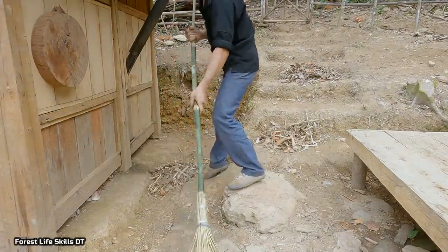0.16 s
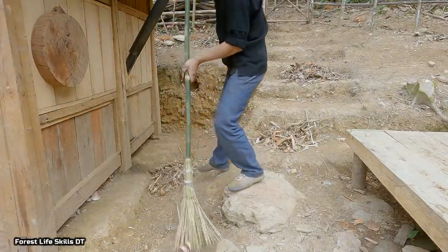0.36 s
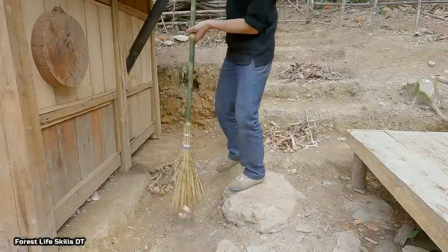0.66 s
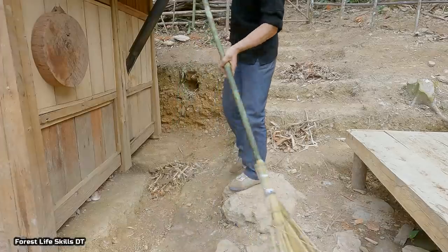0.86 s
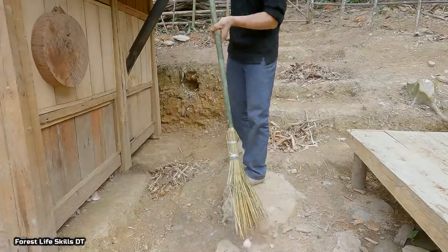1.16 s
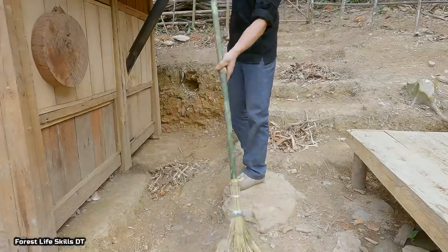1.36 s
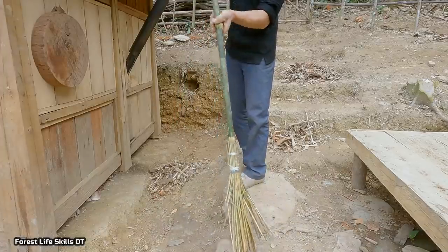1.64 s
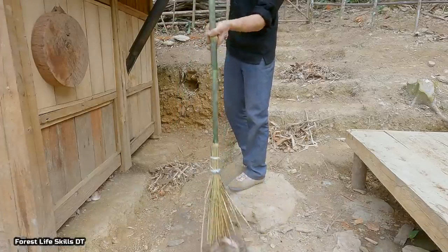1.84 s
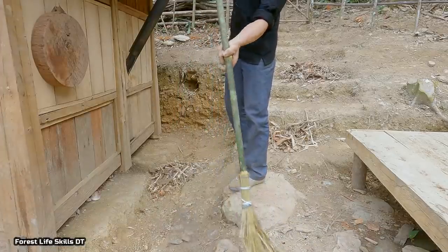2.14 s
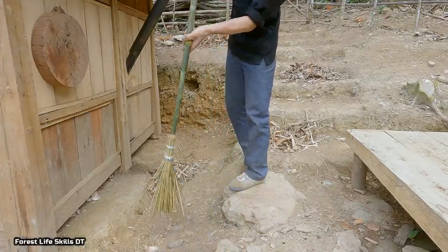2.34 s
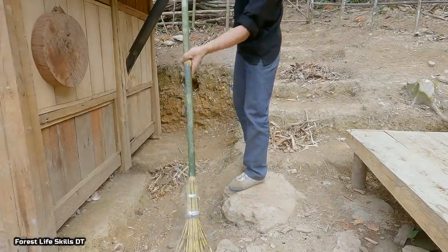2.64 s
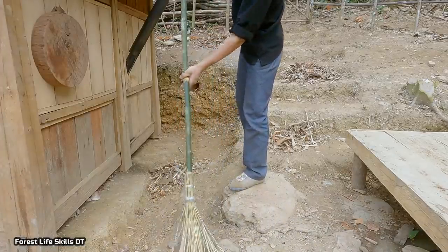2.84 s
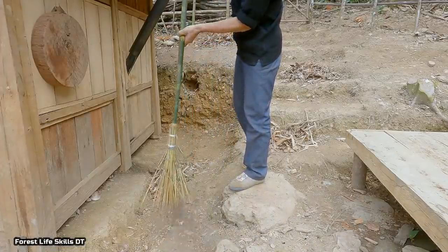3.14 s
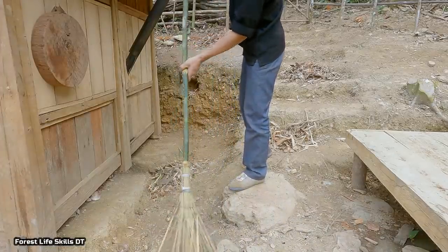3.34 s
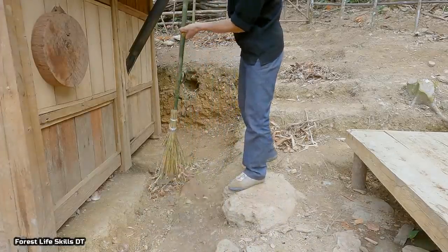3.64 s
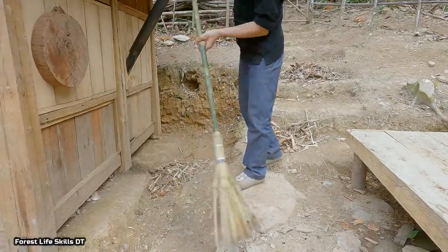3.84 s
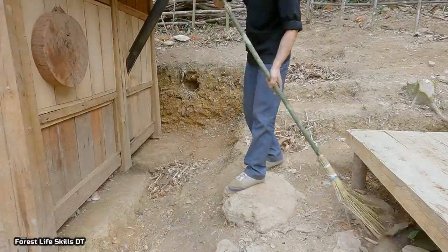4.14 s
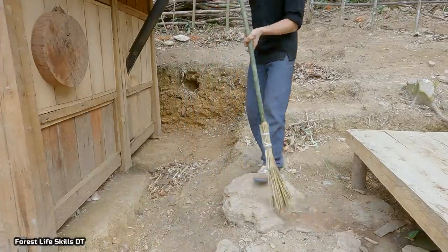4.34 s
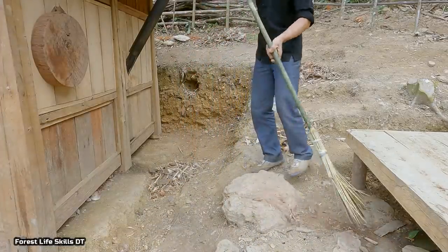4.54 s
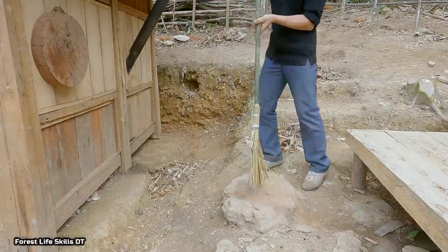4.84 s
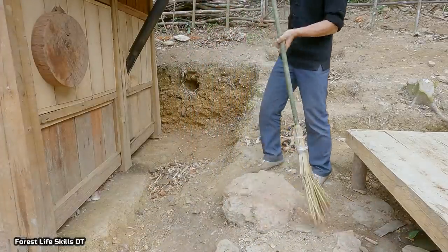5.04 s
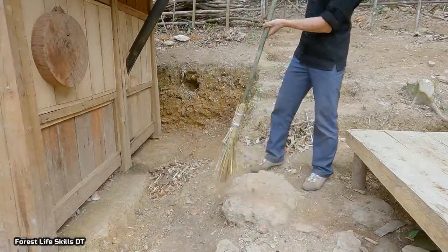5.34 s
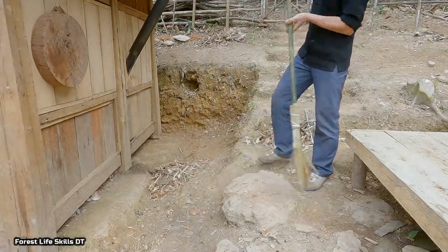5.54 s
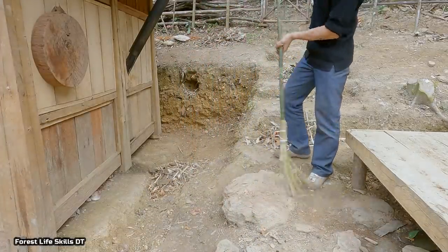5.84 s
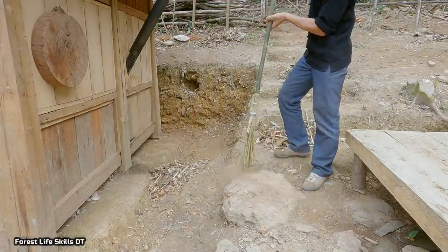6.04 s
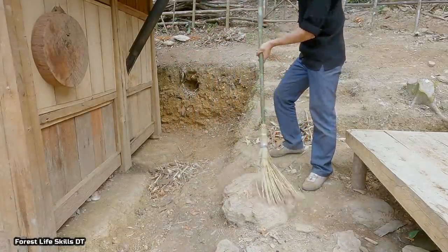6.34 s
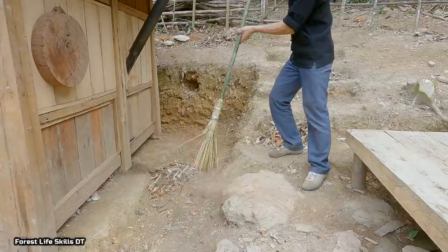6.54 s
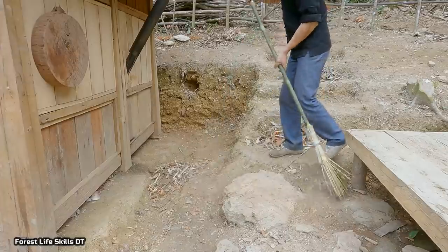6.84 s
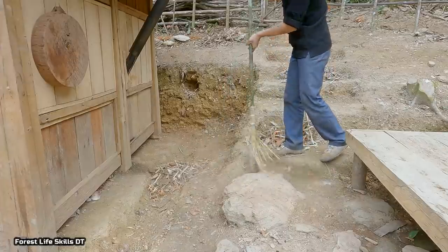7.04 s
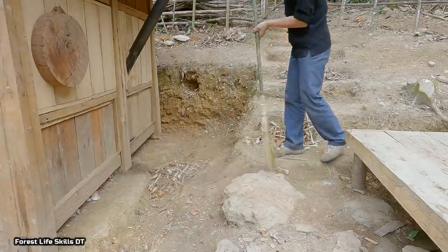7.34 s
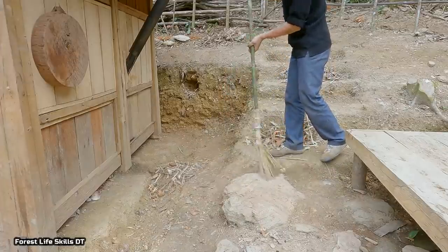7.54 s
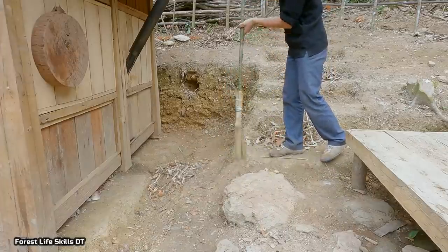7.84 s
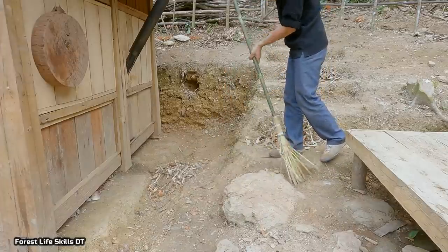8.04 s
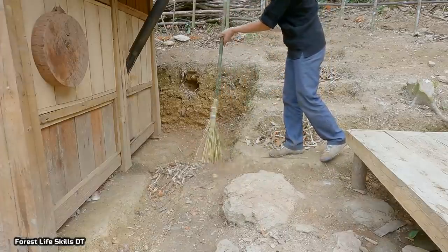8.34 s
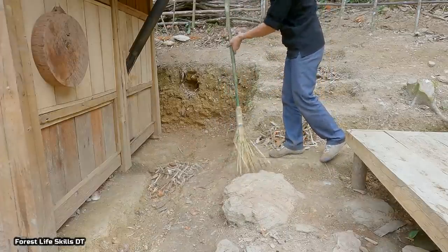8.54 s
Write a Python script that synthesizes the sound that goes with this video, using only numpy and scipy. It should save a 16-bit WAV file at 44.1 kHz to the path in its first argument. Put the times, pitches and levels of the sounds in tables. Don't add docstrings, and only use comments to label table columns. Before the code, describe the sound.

A stiff straw broom sweeps grit and dry leaves over packed earth in steady scratchy strokes, with snapping twigs and one wooden handle knock.

```python
import sys
import numpy as np
from scipy import signal
from scipy.io import wavfile

SR = 44100
rng = np.random.default_rng(int(sys.argv[2]) if len(sys.argv) > 2 else 0)


def dump(signal):
    limited = np.clip(np.atleast_2d(signal).T, -1, 1)
    pcm = np.round(limited * 32767).astype(np.int16)
    wavfile.write(sys.argv[1], SR, pcm)


def voltage_ratio(decibels):
    exponent = np.asarray(decibels, float) / 20
    return 10 ** exponent


N = 383229

# start t/s, rise t/s, hold t/s, tips level/dB, sag over hold level/dB
STROKES = [(0.4, 0.045, 0.16, -24.5, -2.5), (1.128, 0.046, 0.085, -25.5, -5),
           (1.511, 0.062, 0.1, -27.5, -3), (1.874, 0.034, 0.12, -32.5, 3),
           (2.296, 0.04, 0.088, -28.5, -1.5), (2.88, 0.088, 0.16, -24, -4), (3.517, 0.048, 0.1, -26.5, 0.5),
           (4.308, 0.074, 0.11, -24, -6.5), (4.79, 0.025, 0.14, -29.5, 3), (5.265, 0.048, 0.15, -27, -2),
           (5.907, 0.052, 0.13, -25.5, 1.4), (6.513, 0.025, 0.092, -26, 0), (7.048, 0.14, 0.1, -28.5, -8),
           (7.677, 0.011, 0.16, -26, -6.5), (8.281, 0.027, 0.12, -29, -0.5)]
# drag level/dB, grit re tips level/dB, dust re tips level/dB, trickle level/dB, lift-off rate/(dB/s)
BITES = [(-47.5, -9.5, -14, -54.5, 316), (-49, -8.5, -14, -59.5, 205), (-49.5, -10.5, -15.5, -53.5, 255),
         (-51.5, -8.5, -13, -50.5, 268), (-54, -10, -13, -56.5, 173), (-44.5, -9, -13, -54.5, 251),
         (-49, -9, -12.5, -51, 290), (-48, -8.5, -16, -53.5, 294), (-53.5, -9, -14.5, -52.5, 272),
         (-56, -10, -16, -51, 246), (-61, -9, -15, -52, 280), (-52.5, -9.5, -12, -46.5, 262),
         (-49, -8.5, -13, -46, 205), (-53, -9, -14.5, -68, 315), (-50, -8.5, -14, -51, 233)]
# start t/s, rise t/s, hold t/s, tips level/dB, drag level/dB
TOUCHES = [(-.03, 0.022, 0.012, -47.5, -61), (0.178, 0.022, 0.22, -62, -66),
           (0.358, 0.023, 0.067, -36, -56), (2.554, .004, 0.015, -58, -66),
           (5.042, .005, 0.066, -50.5, -73), (1.063, 0.047, 0.04, -30.5, -49),
           (1.432, 0.0071, 0.0066, -57, -80), (1.498, 0.014, 0.0029, -26, -39),
           (1.715, .005, 0.0056, -37.5, -56), (2.318, .004, 0.0036, -27.5, -62),
           (5.28, 0.0046, .006, -34.5, -49), (3.294, 0.0085, 0.0061, -45.5, -52.5),
           (3.416, 0.014, 0.0082, -54, -80), (3.852, 0.026, 0.024, -51.5, -78),
           (4.224, 0.013, 0.069, -33, -61), (4.609, 0.053, 0.17, -68, -78), (5.174, 0.05, 0.015, -55, -66),
           (5.574, 0.016, 0.0036, -64, -66), (5.835, 0.044, 0.0079, -30, -28),
           (6.268, 0.059, 0.027, -47.5, -54), (6.425, 0.041, 0.039, -34, -48.5),
           (7.011, 0.014, 0.13, -35, -57), (7.404, 0.039, 0.038, -41, -52),
           (7.597, 0.017, 0.062, -39.5, -57), (7.799, 0.013, 0.0061, -26, -47),
           (7.93, 0.013, 0.017, -51.5, -84), (5.652, 0.052, 0.046, -53.5, -81),
           (7.526, 0.011, .01, -43.5, -58), (8.207, 0.034, 0.12, -36, -58),
           (8.523, 0.0054, 0.099, -50, -68)]
RISE_POWER, TRICKLE_DB_PER_S, TOUCH_LIFT_DB_PER_S = 1.31, 54.5, 347.5
TOUCH_GRIT_DB, TOUCH_DUST_DB, STILL_DB, STILL_DRAG_DB = -9, -16, -71.5, -72
# f/Hz, level/dB per Hz
SCRATCH_SPECTRUM = [(290, -48), (500, -18), (545, -6), (717, -10.5), (782, -8.5), (1370, 3.5), (1580, -5.5),
                    (1700, 1), (2510, 6.5), (2740, -2.5), (5790, -2), (11900, -4), (15700, -40)]
# f/Hz, level/dB per Hz
DRAG_SPECTRUM = [(15, -52), (25, -8), (108, -35), (151, 0.5), (260, -1.5), (316, 7.5), (700, -14),
                 (910, -33), (1540, -120)]
DRAG_LUMPS_DB = 3
DULLING_DB_PER_DB = 0.086
# t/s, left-right level/dB
BROOM_PAN = [(0, -0.5), (.24, -0.5), (.89, 5), (1.0, 0), (2.9, 1.5), (4.04, 3), (4.15, 0), (5.7, 0),
             (7.3, 1.5), (8.25, 0), (8.69, 2.5)]
# f/Hz, likeness/1
LIKENESS = [(40, 0.52), (300, 0.61), (600, 0.58), (1200, 0.54), (2400, 0.33), (4000, 0.35), (8000, 0.8),
            (15000, .2)]
# f/Hz, level/dB
LEAN = [(60, 1.5), (250, -.5), (600, -2.5), (3000, -2.5), (8000, .5), (13000, -1)]
# t/s, peak level/dB, pitch f/Hz
TWIG_CRACKS = [(0.371, -35, 4600), (1.055, -29.5, 3730), (1.0931, -43, 4810), (1.5135, -17, 5700),
               (1.7247, -17.5, 6250), (1.8826, -44, 4220), (1.904, -28, 5150), (1.966, -12.5, 4400),
               (1.978, -10, 4280), (2.0098, -11, 5540), (2.314, -23, 4880), (2.3232, -11.5, 5150),
               (2.878, -38, 2890), (2.8955, -25, 4550), (6.458, -21, 4840), (3.534, -31, 6680),
               (4.2338, -24.5, 3900), (4.8086, -16, 5800), (5.2815, -24, 5200), (5.8565, -18.5, 3700),
               (6.453, -24, 3420), (6.5354, -13.5, 3610), (7.024, -17, 5260), (7.031, -12.5, 5500),
               (7.6166, -14.5, 5120), (7.6918, -14, 5580), (7.8121, -8.5, 3400), (8.2187, -46, 4780),
               (8.236, -25, 6650), (8.401, -10, 6000)]
# t/s, peak level/dB, pitch f/Hz
PEBBLE_TICKS = [(0.2075, -41, 4010), (0.8415, -28, 6000), (0.9507, -43, 3940), (1.4416, -28, 5010),
                (1.7764, -30, 5730), (2.2159, -28, 5820), (2.5616, -30.5, 4580), (3.232, -30, 4000),
                (5.658, -36, 6420), (2.7916, -37, 3850), (3.3139, -25, 6010), (3.4406, -30.5, 2430),
                (3.49, -35.5, 3440), (3.8482, -39, 3980), (3.9045, -35, 5540), (4.0507, -41, 5580),
                (4.6184, -33, 4860), (4.6628, -30, 3580), (5.0594, -25, 5150), (5.205, -31, 3980),
                (5.22, -30, 5470), (5.6017, -22, 2600), (6.343, -26, 5620), (6.4273, -25, 3770),
                (6.9007, -36, 4530), (7.44, -24, 4390), (7.5283, -28.5, 5660), (8.0585, -26.5, 5370),
                (8.15, -35, 5200), (8.536, -30, 2800)]
# t/s, peak level/dB, pitch f/Hz
PATTER = [(0.2433, -48, 3970), (0.445, -5, 3460), (0.456, -8, 5900), (0.8939, -38, 4260),
          (1.435, -30, 4090), (1.4654, -43, 5310), (1.7524, -30, 4340), (1.8522, -44, 4040),
          (2.3146, -23, 5100), (2.6189, -45, 1630), (2.7596, -39, 4380), (2.9442, -5, 4840),
          (3.8558, -32, 5680), (3.895, -40, 5600), (4.0644, -46, 3940), (4.2498, -17, 3790),
          (4.263, -19, 5670), (4.2744, -18, 4600), (4.7315, -35, 4040), (5.1929, -44, 4510),
          (5.606, -48, 4090), (5.6398, -47, 1590), (5.7083, -35, 4070), (6.2874, -42, 5960),
          (6.992, -37, 3990), (7.43, -30, 4430), (7.4794, -38, 5130), (7.561, -28, 5970),
          (7.6253, -20, 6670), (7.8184, -18, 3340)]
CRACK_T60_S, TICK_T60_S, PATTER_T60_S, PATTER_DB = 0.03, 0.022, 0.037, -6
# t/s, peak level/dB, pitch f/Hz, t60 t/s
CLODS = [
    (2.18, -42, 826, 0.032),
    (4.749, -60, 589, 0.099),
    (5.096, -36.5, 1100, 0.048),
    (5.202, -36, 1750, 0.081),
    (5.853, -17.5, 1170, 0.14),
    (5.862, -12.5, 620, 0.07),
    (6.002, -15.5, 1070, 0.13),
    (6.312, -33.5, 1200, 0.11),
    (7.811, -43, 1830, 0.045),
]
# t/s, peak level/dB, pitch f/Hz, t60 t/s
THUDS = [(0.205, -55.5, 230, 0.11), (1.052, -47, 177, 0.079), (1.902, -38, 202, 0.14),
         (3.852, -53, 185, 0.08), (5.271, -44, 286, 0.15), (7.015, -49, 158, 0.11),
         (7.446, -48.5, 260, 0.12), (7.611, -45, 428, 0.12)]
# t/s, peak level/dB, pitch f/Hz, t60 t/s
PUSHES = [
    (1.1, -50.5, 75, 0.17),
    (1.512, -39.5, 90, 0.15),
    (1.91, -47, 92.5, 0.22),
    (2.318, -33.5, 108, 0.27),
    (2.89, -50, 80, 0.17),
    (3.63, -53, 70, 0.2),
    (5.875, -38.5, 110, 0.51),
]
# t/s, level/dB
KNOCK_CONTACTS = [
    (5.852, -38),
    (5.857, -23),
    (5.861, -26.5),
    (5.865, -23),
    (5.875, -38.5),
    (5.884, -32.5),
]
HANDLE_MODES_HZ = [180, 222, 266, 369, 616, 808, 923, 1190, 1490]
# level/dB, t60 t/s
HANDLE_MODES = [(-19, 0.27), (-15, 0.15), (-26, 0.064), (4, 0.11), (0, 0.11), (-14, 0.092), (7, 0.092),
                (9.5, 0.035), (-9.5, 0.14)]
# start t/s, length t/s, level/dB
SHAFT_RINGS = [(2.5, .025, -51), (2.57, .035, -58), (2.63, .01, -62), (3.09, .09, -48), (3.22, .04, -60),
               (4.26, .03, -55), (5.935, .04, -44), (6.69, .06, -54), (7.045, .04, -44), (7.12, .02, -47),
               (7.31, .04, -54), (7.83, .02, -36), (7.38, .03, -58)]
# start t/s, length t/s, level/dB
STICK_DRAGS = [(.21, 0.066, -67), (.84, 0.051, -70), (1.51, 0.017, -39.5), (1.57, .12, -46),
               (1.91, 0.12, -44.5), (6.44, .05, -52), (7.44, 0.056, -57), (8.58, 0.062, -59.5)]
SHAFT_UNDER_TIPS_DB, WOOD_FADE_S = -18.5, 0.015
# delay t/s, left level/dB, right level/dB
ECHOES = [(.0041, -22, -61.5), (0.0103, -31, -5.5), (0.022, -24.5, -10), (.041, -16.5, -56)]
# start t/s, length t/s, level/dB
CHORUS_BOUTS = [(.24, 0.1, -63), (.72, .07, -66), (.4, .2, -65), (3.0, .3, -64), (3.35, 0.12, -66),
                (4.62, .14, -66), (6.94, .07, -66)]
# start t/s, length t/s, level/dB
RASP_BOUTS = [(.05, 0.21, -71), (.9, 0.11, -82), (2.25, 0.063, -69), (2.68, 0.022, -68), (2.76, 0.072, -73),
              (4.07, .14, -84), (5.7, 0.13, -66), (7.93, 0.085, -71)]
CHORUS_BED_DB, INSECT_FADE_S = -70.5, 0.03
# f/Hz, level/dB per Hz
YARD_SPECTRUM = [(25, -7), (45, 6.5), (75, -23.5), (105, -28), (135, 4), (200, 6), (290, -1), (766, -25.5),
                 (1400, 3.5), (2650, -26), (3960, 2.5), (5620, -2), (7360, -13), (12000, -29)]
YARD_DB = -59


def in_time(rows):
    s, *columns = np.transpose(rows)
    return [np.interp(np.arange(N) / SR, s, c) for c in columns]


def at_hz(points, hz):
    f, db = np.transpose(points)
    return np.interp(np.log(hz), np.log(f), db)


def drift(rate_hz):
    r = np.exp(-80 * np.pi * rate_hz / SR)
    slow = signal.lfilter([1], [1, -2 * r, r * r], rng.standard_normal(N // 40 + 2002))[2000:]
    return np.interp(np.arange(N) / 40, np.arange(len(slow)), slow / slow.std())


def ring(clicks, hz, t60_s):
    r, w = voltage_ratio(-60 / (t60_s * SR)), 2 * np.pi * hz / SR
    return signal.lfilter([0, np.sin(w)], [1, -2 * r * np.cos(w), r * r], clicks + 1e-18)


def band(x, order, low_hz, high_hz):
    return signal.sosfilt(signal.butter(order, [low_hz, high_hz], "band", fs=SR, output="sos"), x)


def panned(db):
    return np.array([voltage_ratio(db / 2), voltage_ratio(-db / 2)])


def contact(t, start, rise, hold, sag_db, lift_db_per_s):
    swell_db = RISE_POWER * 20 * np.log10(np.clip((t - start) / max(rise, .002), 1e-3, 1))
    held = np.clip((t - start - rise) / max(hold, .002), 0, 1)
    return swell_db + sag_db * held - lift_db_per_s * np.maximum(t - start - rise - hold, 0)


def sweeping():
    t = np.arange(0, N / SR + .002, .001)
    rows = [(*stroke, *bite) for stroke, bite in zip(STROKES, BITES)]
    for s, rise, hold, db, drag_db in TOUCHES:
        rows.append((s, rise, hold, db, 0, drag_db, TOUCH_GRIT_DB, TOUCH_DUST_DB, -99, TOUCH_LIFT_DB_PER_S))
    tips, drag = voltage_ratio(2 * STILL_DB), voltage_ratio(2 * STILL_DRAG_DB)
    grit, dust = tips * TOUCH_GRIT_DB, tips * TOUCH_DUST_DB
    for s, rise, hold, db, sag_db, drag_db, grit_db, dust_db, trickle_db, lift in rows:
        shape_db = np.maximum(contact(t, s, rise, hold, sag_db, lift), -120) - 99 * (t < s)
        after = t - s - rise - hold
        trickle = (after > 0) * voltage_ratio(2 * (trickle_db + 4.0 - TRICKLE_DB_PER_S * np.abs(after)))
        power = voltage_ratio(2 * (db + shape_db)) + trickle
        tips = tips + power
        drag = drag + voltage_ratio(2 * (drag_db + shape_db))
        grit = grit + power * grit_db
        dust = dust + power * dust_db
    return in_time(np.transpose([t, 10 * np.log10(tips), 10 * np.log10(drag), grit / tips, dust / tips]))


def grains(tips_db):
    per_s = 9000 * 2 ** ((tips_db + 32.0) / 9.0) * voltage_ratio(3 * drift(25))
    chance = np.clip(per_s, 1500, SR / 2) / SR
    moved = rng.random(N) < chance
    return moved / np.sqrt(chance) * rng.standard_normal((2, 2, N))


def straws(tips_db, per_s, cycles):
    heights_db = tips_db + 5.0 * np.clip(rng.standard_normal(N), -3, 1.6)
    plucked = (rng.random(N) < per_s / SR) * voltage_ratio(heights_db)
    dealt = rng.integers(0, 30, N)
    sides = panned(5.7 * rng.standard_normal(N)) * rng.choice([-1, 1], (2, N))
    out = 0
    for k, hz in enumerate(np.geomspace(1400, 9000, 30)):
        mine = plucked * sides * (dealt == k)
        out = out + voltage_ratio(at_hz(SCRATCH_SPECTRUM, hz)) * ring(mine, hz, min(cycles / hz, .04))
    return out


def broom_and_yard(tips_db, drag_db, grit_db, dust_db):
    pan_db, = in_time(BROOM_PAN)
    clicks, white = grains(tips_db), rng.standard_normal((2, 2, N))
    loose = 1 + np.clip((-42.5 - tips_db) / 15, 0, 1)
    lulls_db, clumps_db = 0.9 * drift(5.6), 0.8 * drift(40)
    fine_db = dust_db - 1.5 + DULLING_DB_PER_DB * np.minimum(tips_db + 46, 0)
    edges_hz, out = 25 * 2 ** (np.arange(29) / 3), 0
    for k, (low, high) in enumerate(zip(edges_hz, edges_hz[1:])):
        hz = np.sqrt(low * high)
        coarse = np.clip(np.log2(3200 / hz) / 0.38, 0, 1)
        fine = np.clip(np.log2(hz / 7000) / 0.12, 0, 1)
        scratch_db = tips_db + coarse * (grit_db + 0.5) + fine * fine_db + at_hz(SCRATCH_SPECTRUM, hz) + 8.5
        patches_db = clumps_db * loose + 1.8 * drift(9) + 1.5 * drift(35)
        scratch = (hz > 500) * voltage_ratio(scratch_db + patches_db)
        hum = voltage_ratio(YARD_DB + at_hz(YARD_SPECTRUM, hz) + lulls_db + 3.0 * drift(7.0))
        drag = (hz < 700) * voltage_ratio(drag_db + at_hz(DRAG_SPECTRUM, hz) + 9.5 + DRAG_LUMPS_DB * drift(6.9))
        mid, side = band(scratch * clicks[k % 2] + (hum + drag) * white[k % 2], 2, low, high)
        alike = np.clip(at_hz(LIKENESS, hz), -.99, .99)
        pair = np.sqrt(1 + alike) * mid + np.sqrt(1 - alike) * side * [[1], [-1]]
        out = out + pair * panned(at_hz(LEAN, hz))[:, None] / np.sqrt(2)
    out += voltage_ratio(-13.0) * straws(tips_db, per_s=290, cycles=225)
    return out * panned(pan_db - np.mean(pan_db))


def bursts(events, bright_db, octaves, alike, rise_cycles, pan_db):
    out, t = np.zeros((2, N + SR)), np.arange(SR // 5) / SR
    for s, peak_db, hz, t60_s in events:
        decay = voltage_ratio(-60 * t / max(t60_s, .003)) * np.minimum(t * hz / rise_cycles, 1)
        puff = rng.standard_normal((2, len(t))) * decay
        puff[:, round(SR / hz)] += 2.5
        puff[1] = alike * puff[0] + np.sqrt(1 - alike ** 2) * puff[1]
        near = band(puff, 2, hz / 2 ** (octaves / 2), hz * 2 ** (octaves / 2))
        body = near + voltage_ratio(bright_db) * band(puff, 3, hz / 3.17, min(hz * 1.9, 9500))
        at = round(s * SR)
        out[:, at:at + len(t)] += body / np.abs(body).max() * voltage_ratio(peak_db) * panned(pan_db)[:, None]
    return out[:, :N]


def snaps():
    events = [(*row, CRACK_T60_S) for row in TWIG_CRACKS]
    events += [(*row, TICK_T60_S) for row in PEBBLE_TICKS]
    events += [(s, db + PATTER_DB, hz, PATTER_T60_S) for s, db, hz in PATTER]
    return voltage_ratio(-2.5) * bursts(events, bright_db=2.5, octaves=0.6, alike=0.9, rise_cycles=1.5, pan_db=-1.5)


def ground_hits():
    clods = bursts(CLODS, bright_db=-8.0, octaves=0.45, alike=1.0, rise_cycles=3.4, pan_db=-1.4)
    thuds = bursts(THUDS, bright_db=-8, octaves=0.8, alike=0.98, rise_cycles=0.92, pan_db=-1.2)
    pushes = bursts(PUSHES, bright_db=-4.5, octaves=1.3, alike=0.97, rise_cycles=0.25, pan_db=-1.5)
    return voltage_ratio(-6.5) * clods + voltage_ratio(2.5) * thuds + pushes


def handle():
    clicks = np.zeros(N)
    for s, db in KNOCK_CONTACTS:
        clicks[round(s * SR)] = voltage_ratio(db)
    soft = band(clicks + 1e-18, 2, 110, 1800) * voltage_ratio(-5.5)
    leans_db = np.linspace(-.5, -5.0, len(HANDLE_MODES))
    out = 0
    for hz, (db, t60_s), lean_db in zip(HANDLE_MODES_HZ, HANDLE_MODES, leans_db):
        out = out + voltage_ratio(db) * ring(soft, hz, t60_s) * panned(lean_db)[:, None]
    return out


def echoes(near):
    dull, out = band(near, 1, 350, 4200), np.zeros_like(near)
    for delay_s, *db in ECHOES:
        lag = round(delay_s * SR)
        out[:, lag:] += voltage_ratio(np.array(db))[:, None] * dull[::-1, :-lag]
    return out


def whistle(bouts, bed_db, fade_s, hz, t60_s):
    tone = ring(ring(rng.standard_normal((2, N)), hz, t60_s), hz, t60_s)
    t, gain = np.arange(N) / SR, voltage_ratio(bed_db)
    for s, length, db in bouts:
        inside = np.minimum(t - s, s + length - t)
        gain = gain + voltage_ratio(db) * np.clip(inside / fade_s + 1, 0, 1) ** 2
    return tone / tone.std() * gain * voltage_ratio(1.8 * drift(25))


def ringing_wood(tips_db):
    shaft = whistle(SHAFT_RINGS, tips_db + SHAFT_UNDER_TIPS_DB, WOOD_FADE_S, hz=1600, t60_s=.026)
    return shaft + whistle(STICK_DRAGS, -99, WOOD_FADE_S, hz=1020, t60_s=.014)


def insects():
    chorus = whistle(CHORUS_BOUTS, CHORUS_BED_DB, INSECT_FADE_S, hz=4010, t60_s=.016)
    return chorus + whistle(RASP_BOUTS, -80, INSECT_FADE_S, hz=4400, t60_s=.004)


def scene():
    strokes = sweeping()
    near = broom_and_yard(*strokes) + snaps() + ground_hits() + handle()
    return near + echoes(near) + ringing_wood(strokes[0]) + insects()


def band_limit(x):
    return signal.sosfilt(signal.butter(12, 15810, fs=SR, output="sos"), x)


def record(dry):
    ports = np.array([np.roll(dry[0], 1), dry[1]])
    ports = signal.sosfilt(signal.butter(2, 45, "high", fs=SR, output="sos"), ports)
    rounded = 0.73 * np.tanh(ports / 0.67)
    top_cut = signal.cheby2(10, 60, 16300, fs=SR, output="sos")
    return band_limit(signal.sosfilt(top_cut, rounded))


dry = scene()
out = record(dry)
dump(out)
```